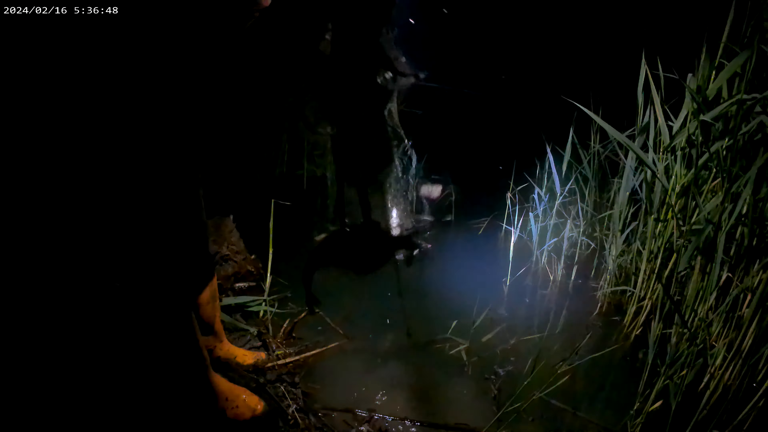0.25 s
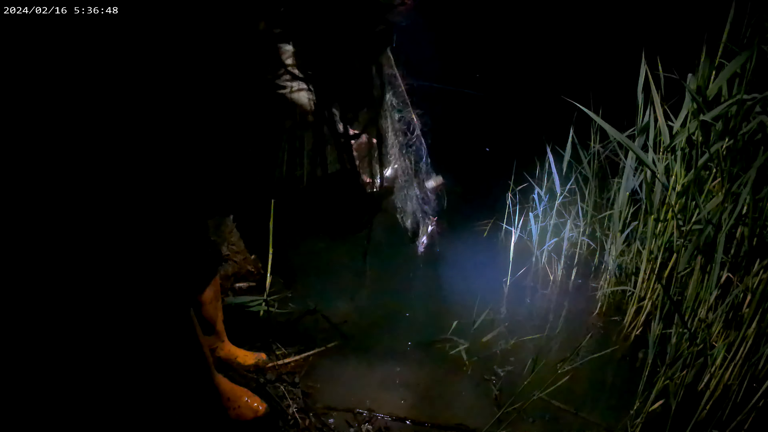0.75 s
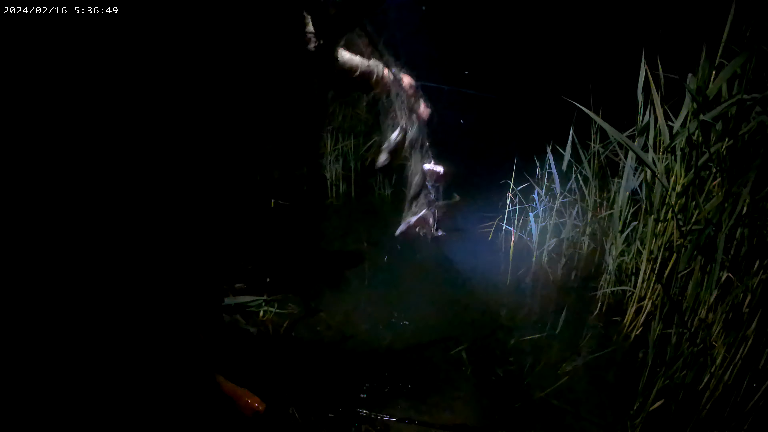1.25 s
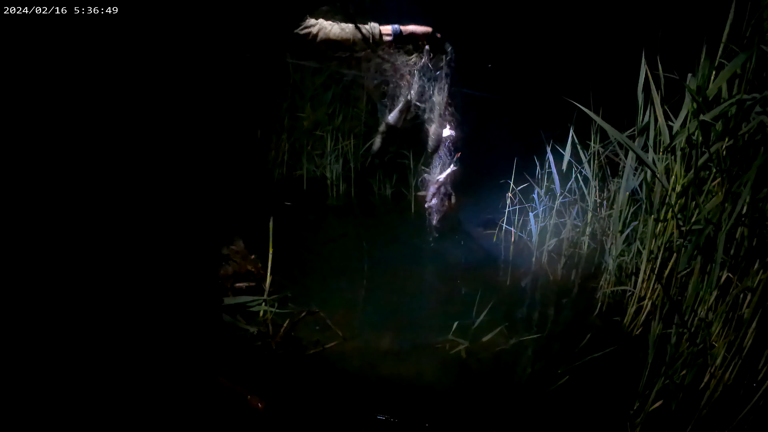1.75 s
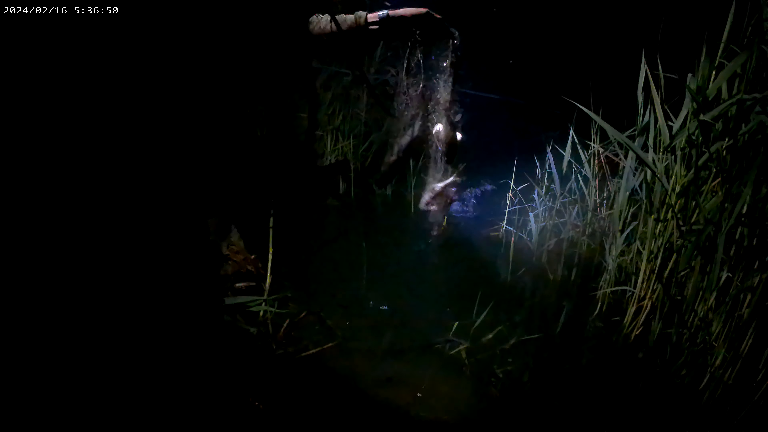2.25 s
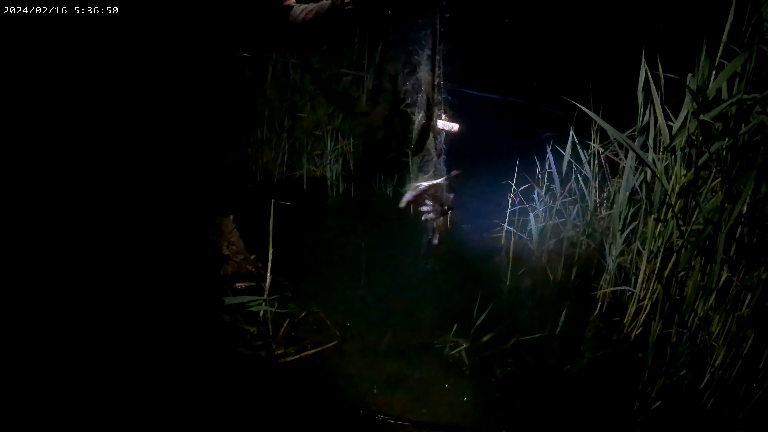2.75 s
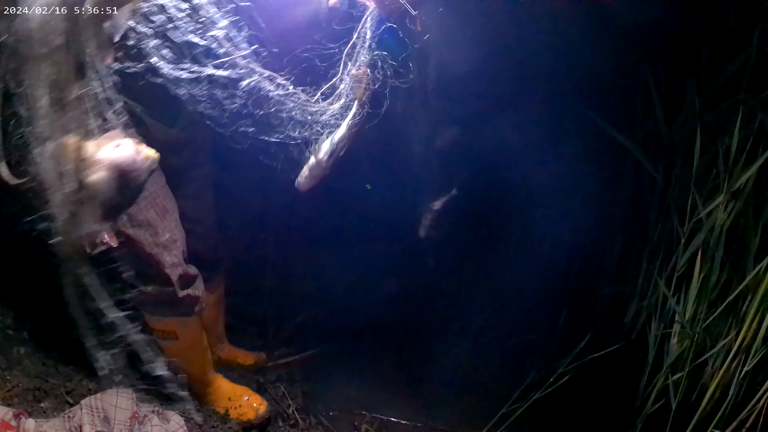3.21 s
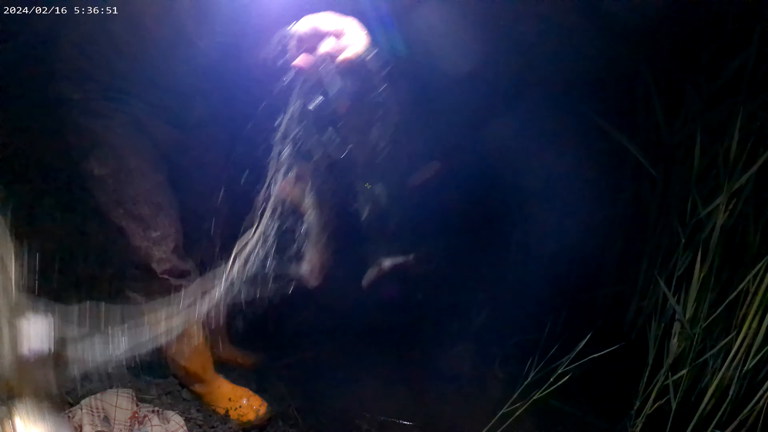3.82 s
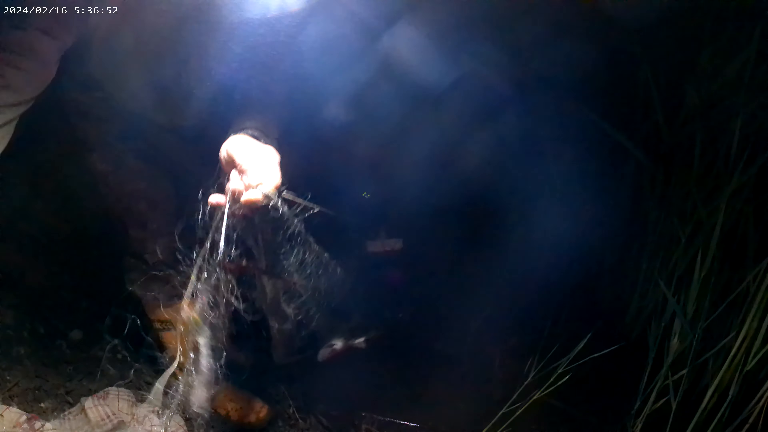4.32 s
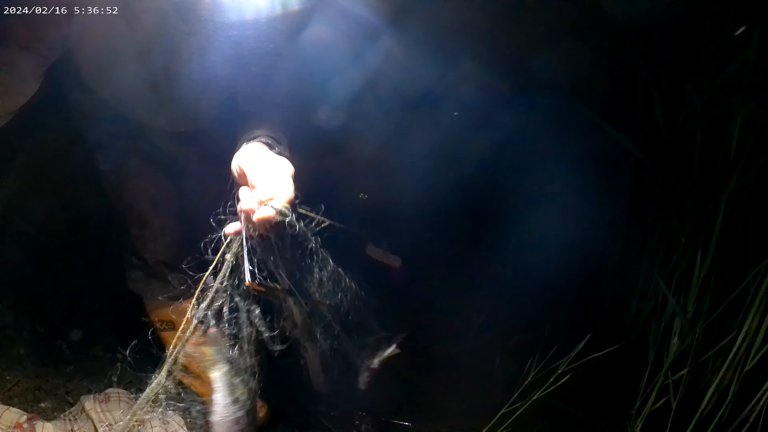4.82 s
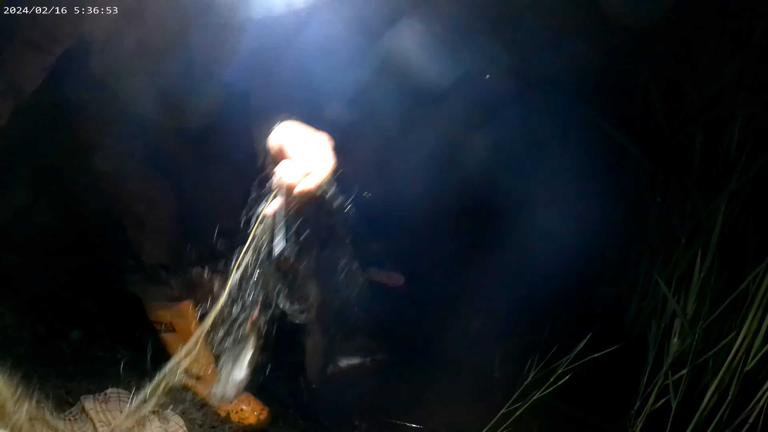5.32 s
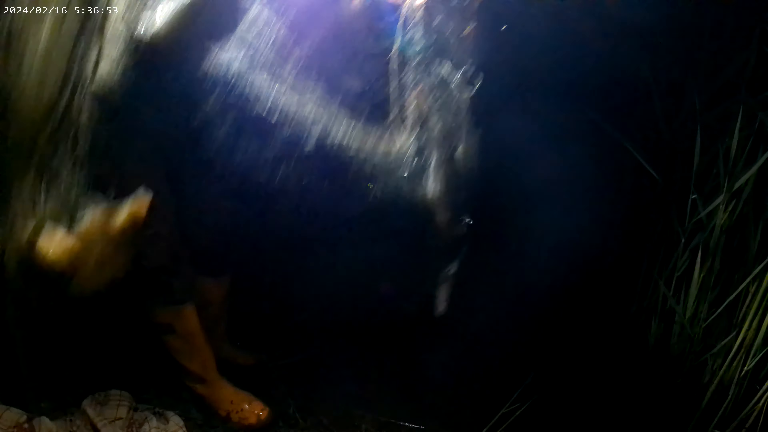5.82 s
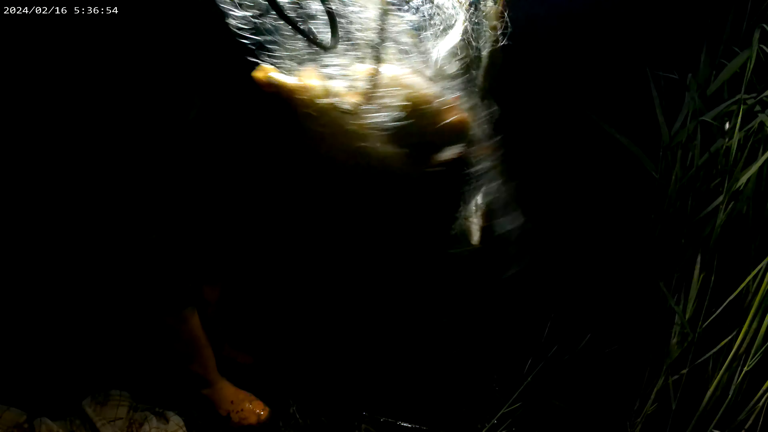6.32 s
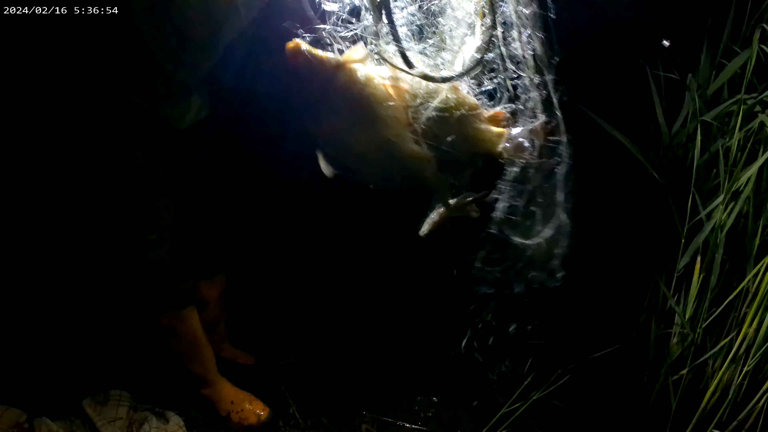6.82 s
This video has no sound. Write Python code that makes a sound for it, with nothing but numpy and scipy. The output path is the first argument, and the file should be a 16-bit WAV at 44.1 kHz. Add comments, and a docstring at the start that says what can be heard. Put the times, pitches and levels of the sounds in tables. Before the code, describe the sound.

A wet fishing net is lifted by hand from still water, close to a body-worn microphone. After one sharp click, water falls in a small splash and single plops, then in a longer gurgling trickle. The mesh then knocks and rubs against the microphone's case, squelching and crackling. Strands tick, one snaps free, and a last drop falls. A quiet rumble, hiss, soft regular thump and faint high whine continue throughout.

```python
"""Night, still water: a wet gill net is lifted and gathered by hand, close to a small body-worn camera.
The camera gives one sharp click, then water falls off the mesh in a short splash and single plops, with
a longer run-off around two seconds. From about four seconds handling knocks and rubs the camera's case
while the strands tick and squelch. A taut strand snaps free near six seconds, and a last drop falls.
Under it all lie a low rumble, hiss, and the camera's own soft regular thump and thin whine."""
import sys
import numpy as np
from scipy import signal
from scipy.fft import rfft, irfft, next_fast_len
from scipy.io import wavfile
from scipy.ndimage import uniform_filter1d

SR = 44100
rng = np.random.default_rng(int(sys.argv[2]) if len(sys.argv) > 2 else 0)


def to_wav(s):
    """Save 16-bit WAV."""
    ch = np.atleast_2d(s).T  # columns
    pcm = np.round(np.clip(ch, -1, 1) * 32767)  # PCM
    wavfile.write(sys.argv[1], SR, pcm.astype(np.int16))


N = 311234
T = np.arange(N) / SR

# Air bubbles pulled under by the larger drops.
# Each row: start in seconds, pitch in Hz, peak in dB, length in seconds, glide in octaves.
DROP_BUBBLES = [(.509, 954, -38, 0.0089, -0.11), (.511, 1140, -53, 0.014, -0.15),
                (0.513, 1920, -61, .007, 0), (0.509, 736, -53, 0.034, -0.064),
                (.516, 910, -58, 0.034, -0.27), (0.583, 1340, -60, 0.02, -0.16),
                (0.604, 608, -51, 0.032, 0.17), (.628, 796, -59, 0.033, 0.82), (0.666, 1250, -65, .013, .1),
                (0.684, 547, -54, 0.04, 0.36), (0.725, 825, -64, .014, .15),
                (1.608, 1120, -58, .012, -0.088), (1.661, 1290, -55, 0.006, 0.11),
                (1.758, 544, -55.5, 0.018, 0.2), (1.882, 1640, -50, 0.0097, -0.03),
                (1.978, 1130, -49, 0.0036, 0.056), (1.99, 1120, -48, 0.0054, -0.057),
                (2.012, 874, -51.5, 0.035, 0.065), (2.015, 1300, -56, .008, -0.021),
                (2.023, 1030, -51, .014, 0.039), (2.034, 550, -51.5, 0.011, 0.05),
                (2.058, 3700, -46.5, 0.0056, 0.37), (2.062, 1180, -52, 0.011, .1),
                (2.068, 3700, -54, 0.005, -0.4), (2.069, 1700, -53.5, 0.011, 0.7),
                (2.079, 690, -53, 0.018, -0.4), (2.083, 1080, -51, .016, -0.18),
                (2.099, 1800, -49, 0.0075, 0), (2.104, 850, -51, 0.014, 0.19),
                (2.1062, 1570, -35.5, 0.0042, -0.63), (2.175, 1050, -35, 0.012, -0.15),
                (2.186, 2950, -53, .0055, 0), (2.204, 870, -34.5, 0.0072, -0.074),
                (2.2205, 919, -32, 0.023, -.05), (2.229, 477, -55, 0.026, -0.31),
                (2.266, 764, -50, 0.0068, 0.05), (2.277, 1370, -52, 0.02, -0.21),
                (2.286, 700, -50, 0.018, .12), (2.296, 2170, -60, .012, .05),
                (2.302, 906, -49.5, 0.024, .1), (2.326, 1350, -57, 0.014, -0.02),
                (2.356, 1090, -47.5, 0.019, 0.24), (2.362, 853, -45, 0.031, 0.063),
                (2.369, 1560, -56, .011, 0.2), (2.391, 373, -51, 0.061, 0.75), (2.458, 1365, -59, .015, 0),
                (2.896, 1120, -50, 0.0086, 0.19), (2.928, 1320, -60, .012, .1),
                (6.687, 1570, -50.5, 0.014, -0.28), (6.698, 1500, -61, .012, 0)]
# Air pockets in the squeezed mesh. Each row reads as for the drop bubbles.
AIR_POCKETS = [(3.9117, 1410, -43.5, .006, 0.036), (3.912, 2100, -50, .005, 0),
               (3.922, 1220, -51, 0.0088, 0), (4.01, 1280, -55, .012, .05), (4.054, 1150, -51, .02, .11),
               (4.106, 1090, -53, 0.0063, 0), (4.192, 1055, -48, .012, -0.14),
               (4.295, 1150, -46, 0.0054, 0), (4.315, 980, -51, .009, 0.14), (4.373, 2200, -55, .005, -.1),
               (4.447, 1490, -52, 0.0059, 0.02)]
# Fine droplets striking the surface alone. Each row: start in seconds, peak in dB, pitch in Hz.
DROPLET_PINGS = [(1.938, -46.5, 5570), (2.01, -55, 5590), (2.105, -46, 5450), (2.108, -51, 4160),
                 (2.160, -55, 4200), (2.271, -55, 3770), (2.298, -48, 5740), (2.307, -48, 3960),
                 (2.369, -52, 5030)]
# Wet strands snapping past each other. Each row: start in seconds, peak in dB, centre in Hz.
STRAND_TICKS = [(0.32, -52, 5700), (0.412, -57, 5960), (0.756, -52.5, 4150), (.772, -56.5, 5500),
                (0.938, -57.5, 5000), (1.039, -56, 6000), (1.335, -56.5, 3330), (3.508, -55.5, 4770),
                (3.673, -52.5, 7850), (5.455, -55, 4300), (5.608, -59, 4440), (6.254, -54.5, 4900),
                (6.72, -60, 5480)]
# Strands catching on the case and flicking free. Each row: start in seconds, peak in dB.
STRAND_FLICKS = [(3.918, -49), (4.008, -40.5), (4.134, -50), (4.323, -53), (4.539, -55), (4.677, -43.5),
                 (4.982, -48), (5.0746, -52), (5.135, -55), (5.17, -58), (5.3425, -55), (5.5176, -56)]
# Blows on the case, right at the microphone. Each row: start in seconds, peak in dB, scrape tilt in dB
# per octave, pitch in Hz, ring and slide times in seconds, scrape against ring in dB.
CASE_BLOWS = [(3.9103, -35.5, -0.5, 970, 0.0026, 0.0022, -5),
              (3.9909, -24.5, -1.5, 1144, 0.0025, 0.003, 10), (4.0838, -38, -5, 620, 0.0014, 0.0014, 4),
              (4.0885, -27, -2, 590, 0.0031, 0.0022, -3.5), (4.143, -42, -2, 1000, 0.0018, .0015, 4),
              (4.1812, -22.5, -2.5, 374, 0.003, 0.0012, 2.5),
              (4.1861, -23.5, -2.5, 604, 0.00093, 0.00047, 0.5),
              (4.2572, -36.5, -2.5, 640, 0.00089, 0.00096, 3), (4.31, -38, -2.5, 1046, .004, 0.00043, 5),
              (4.369, -39.5, -5, 474, 0.0016, 0.0009, -2), (4.4413, -28, 0, 514, 0.0047, 0.0029, -1),
              (5.438, -46, -1, 416, .004, .002, -3), (5.5182, -37.5, -1.5, 670, 0.00088, 0.0013, -2)]
# Folds of wet mesh hitting the case.
# Each row: start in seconds, peak in dB, tilt in dB per octave, slide time in seconds.
MESH_FLAPS = [(3.872, -39.5, -2.5, 0.0038), (3.936, -48, -1, .003), (4.017, -45, 4, 0.0042),
              (4.077, -40, 1.5, 0.0022), (4.091, -38, -1.5, 0.0017), (4.102, -49, -1, 0.0035),
              (4.129, -41.5, 0, 0.0082), (4.224, -43, 1.5, 0.0073), (4.284, -40.5, -3.5, 0.0036),
              (4.295, -36, -1, 0.0025), (4.305, -51, -3, 0.0056), (4.372, -49.5, 8, 0.0036),
              (4.455, -40.5, -0.5, 0.0078), (4.523, -49, 0.5, 0.012), (4.636, -50.5, 0, 0.0062)]
# Resonances of the case around the microphone. Each row: centre in Hz, width in Hz, gain in dB.
CASE_MODES = [(129, 170, 3), (347, 190, 2.5), (580, 450, 1.5), (950, 380, 1), (1170, 340, -3.5),
              (2520, 690, -8), (5180, 1900, -15), (8800, 1400, -20), (9970, 1100, -17),
              (15100, 2200, -20.5)]
# The camera jolting with the body. Each row: crest in seconds, frequency in Hz, peak in dB.
BODY_JOLTS = [(0.318, 10.3, -39.5), (3.189, 65, -38.5), (3.993, 166, -37), (4.469, 100, -44),
              (4.938, 59, -39)]
# Drifting pace of the camera's thump. Each row: time in seconds, thumps per second.
THUMP_PACE = [(0, 5.455), (1.4, 5.457), (3.7, 5.43), (6.2, 5.482), (7.06, 5.485)]
# Whine of the camera's power supply.
# Each row: time in seconds, pitch in Hz, sweep per picture frame in Hz, level in dB.
WHINE_TRACK = [(0, 14400, 400, -73), (2.9, 14400, 280, -75), (3.08, 14080, 200, -74.5),
               (3.35, 14270, 100, -79), (5.1, 14380, 80, -77), (6.05, 14100, 200, -81),
               (6.25, 14400, 650, -72.5), (7.06, 14420, 400, -73)]

# Movements that swell and ebb. Each row: crest in seconds, level in dB, swell and ebb times in seconds.
RUNOFF_SWELLS = [(.515, -67, 0.0056, 0.023), (.62, -70.5, .05, 0.13), (1.65, -68, 0.032, 0.027),
                 (1.85, -69.5, 0.17, .7), (2.018, -58.5, 0.015, 0.042), (2.094, -51.5, 0.023, 0.029),
                 (2.31, -56.5, 0.14, 0.06), (2.43, -62.5, .015, 0.043), (2.91, -76, .015, 0.027)]  # trickles and gushes leaving the net
CRACKLE_SWELLS = [(4.14, -74, 0.14, 0.17), (4.55, -71, .2, .2), (4.705, -63, 0.018, .035),
                  (5.15, -68, 0.032, 0.032), (5.47, -71, .1, .06), (5.71, -72.5, .06, 0.09)]  # mesh drawn through the hand
RUB_SWELLS = [(3.925, -56.5, 0.047, 0.03), (4.012, -52, 0.025, 0.029), (4.088, -49.5, 0.021, 0.031),
              (4.19, -50.5, 0.021, 0.018), (4.3, -59, .03, 0.019), (4.47, -59.5, .012, .05),
              (4.27, -59, 0.2, 0.46), (5.47, -63.5, 0.15, 0.099)]  # cloth and mesh stroking the case

# Tone of each source at the microphone. Each row: frequency in Hz, relative level in dB.
GURGLE_SPECTRUM = [(300, 3.5), (550, -3.5), (950, 6.5), (1350, 9.5), (1800, 2), (2600, -3), (4000, -29)]  # bubbles under the run-off
SPRAY_SPECTRUM = [(1500, -16), (2500, -3.5), (4000, -6), (5700, 6), (7500, -7), (10000, 5), (12000, -6),
                  (16000, -4)]  # tiny droplets
WASH_SPECTRUM = [(1500, 0.5), (2400, -8), (3300, -1.5), (4500, -1.5), (5600, 1.5), (6600, -5.5),
                 (8000, -8.5), (10000, -7.5), (12000, -15), (16000, -28)]  # dense patter on the surface
FLICK_SPECTRUM = [(1500, -18), (2500, -7), (3400, -9), (4700, -8), (5700, -1.5), (7300, -11), (8800, -2),
                  (10100, 4), (11500, -12), (13000, -15), (15000, -2), (16000, -16)]  # flicking, crackling strands
SNAP_SPECTRUM = [(300, -10), (750, 3), (1500, 4), (2200, -8), (3200, -10), (6000, -20), (16000, -38)]  # a taut strand snapping free
CLICK_SPECTRUM = [(300, 1.5), (2000, 2), (6000, 4), (11000, 3.5), (14000, -5), (16000, 5)]  # the electrical click
BACKGROUND_SPECTRUM = [(15, 1), (25, -5.5), (43, -2.5), (63, 1.5), (134, -9), (250, -14), (400, -17.5),
                       (600, -21.5), (1030, -24.5), (1350, -27), (1900, -30), (3400, -34), (11000, -39),
                       (13000, -37), (16000, -42)]  # rumble and hiss


def plops(waver_db=1, droplet_cycles=7.5):
    """Close drops each trap a bubble that wavers in the stirred water; single droplets ping."""
    out = np.zeros(N)
    for start, hz, db, length, glide in DROP_BUBBLES:
        ring = bubble(hz, length, glide)
        waver = wander(SR, size=200)[:len(ring)]
        add(out, start, ring * undb(db + waver_db * waver))
    for start, db, hz in DROPLET_PINGS:
        add(out, start, undb(db) * bubble(hz, droplet_cycles / hz, glide=0))
    return out


def runoff():
    """Water off the net patters on the surface: bubbles gurgle, and spray and wash land just after."""
    chirps = swarm(count=9000, low_hz=400, high_hz=2400, cycles=6, spread_db=9, glide=.25)
    gliders = swarm(count=900, low_hz=450, high_hz=1900, cycles=20, spread_db=7, glide=.35)
    droplets = swarm(count=7000, low_hz=2000, high_hz=11000, cycles=7, spread_db=14, glide=.2)
    gurgle = level(colour(chirps, GURGLE_SPECTRUM), 0) + level(colour(gliders, GURGLE_SPECTRUM), -3.5)
    spray = level(colour(droplets, SPRAY_SPECTRUM), -9)
    wash = level(colour(grains(rate=8300, spread_db=1.6), WASH_SPECTRUM), -4)
    return (gurgle * swells(RUNOFF_SWELLS)
            + spray * swells(RUNOFF_SWELLS, delay_s=.0049)
            + wash * swells(RUNOFF_SWELLS, delay_s=.0077))


def strands(tick_cycles=22):
    """The mesh crackles as the hand draws it in; strands slip free in bright ticks and flicks."""
    crackle = colour(grains(rate=700, spread_db=1.5), FLICK_SPECTRUM)
    out = level(crackle, 0) * swells(CRACKLE_SWELLS)
    for start, db, hz in STRAND_TICKS:
        friction = slip(tick_cycles / hz)  # high ticks die soonest
        width = .72 * hz
        tick = resonate(resonate(friction, hz, width), hz, width)
        add(out, start, peak(tick, db))
    for start, db in STRAND_FLICKS:
        flick = colour(slip(length_s=.002), FLICK_SPECTRUM)
        add(out, start, peak(flick, db))
    return out


def knocks(rise_s=.001):
    """A soft blow rings briefly at a pitch set by what hits the case, and scrapes across it."""
    out = np.zeros(N)
    t = np.arange(SR // 12) / SR
    for start, db, tilt_db, hz, ring_s, slide_s, scrape_db in CASE_BLOWS:
        ring = np.sin(2 * np.pi * hz * t) * (1 - np.exp(-t / rise_s)) * np.exp(-t / ring_s)
        scrape = through_case(slip(slide_s), tilt_db)
        blow = peak(ring, 0) + peak(scrape, scrape_db)
        add(out, start, peak(blow, db))
    return out


def flaps(grip_spread=.06, catch_db=.5):
    """Wet folds slap and slide unevenly on the case, each under a slightly different grip."""
    out = np.zeros(N)
    for start, db, tilt_db, slide_s in MESH_FLAPS:
        slide = slip(slide_s)
        grip = 1 + grip_spread * rng.uniform(-1, 1)
        catching = undb(catch_db * wander(len(slide), size=50))
        add(out, start, peak(through_case(slide * catching, tilt_db, grip), db))
    return out


def squelches():
    """Air pockets pop and squeak in the squeezed wet mesh, the tiny ones along with the rubbing."""
    pops = swarm(count=1100, low_hz=567, high_hz=1614, cycles=16, spread_db=6, glide=.19)
    out = level(colour(pops, GURGLE_SPECTRUM), -7) * swells(RUB_SWELLS)
    for start, hz, db, length, glide in AIR_POCKETS:
        add(out, start, undb(db) * bubble(hz, length, glide))
    return out


def strand_snap(start_s=5.957, db=-44):
    """One taut strand snaps free in a short burst of friction."""
    out = np.zeros(N)
    snap = colour(slip(length_s=.0015), SNAP_SPECTRUM)
    add(out, start_s, peak(snap, db))
    return out


def rubbing(soft_patchy_db=2.5, hard_patchy_db=3.5):
    """Cloth and mesh rustle through the case in clumps of soft catches and harder, brighter patches."""
    soft = level(through_case(grains(rate=2500, spread_db=.21), tilt_db=-1), 0)
    soft *= undb(soft_patchy_db * wander(N, size=400))
    hard = through_case(grains(rate=2500, spread_db=1), tilt_db=6)
    hard *= undb(hard_patchy_db * np.clip(wander(N, size=700), -2, 1.2))
    return (soft + level(hard, -11)) * swells(RUB_SWELLS)


def through_case(push, tilt_db, grip=1):
    """The plastic case rings in damped bands; hard contact favours the upper ones, grip shifts them."""
    f = np.geomspace(20, SR / 2, 400)
    bands = (undb(db) / (1 + (2 * (f - hz * grip) / width) ** 2) for hz, width, db in CASE_MODES)
    power = sum(band ** 2 for band in bands) + undb(-62) ** 2
    power = power * f ** 2 / (f ** 2 + 60 ** 2)  # bass falls away below 60 Hz
    octaves = np.log2(np.clip(f, 200, 4000) / 1000)
    response_db = 10 * np.log10(power) + tilt_db * octaves
    return colour(push, np.column_stack([f, response_db]))


def jolts():
    """Each jolt of the body is one slow swing of pressure at the microphone."""
    out = np.zeros(N)
    for crest, hz, db in BODY_JOLTS:
        cycles = (T - crest) * hz
        out += undb(db) * np.exp(-(2 * cycles) ** 2) * np.cos(2 * np.pi * cycles)
    return out


def click(start_s=.1512):
    """One dry electrical click: a single spike with no ring."""
    out = np.zeros(N)
    add(out, start_s, colour(signal.unit_impulse(SR // 50), CLICK_SPECTRUM))
    return out


def thumps(first_s=.1739, hz=95, rise_hz_per_s=7300, width_s=.0073, db=-41.5):
    """The camera's electronics thump evenly; each soft pulse sweeps upward through the bass."""
    rate = np.interp(T, *np.transpose(THUMP_PACE))
    turns = np.cumsum(rate) / SR - first_s * rate[0]
    t = (turns - np.round(turns)) / rate  # seconds from the nearest thump
    envelope = np.exp(1 - np.hypot(1, t / width_s * 1.82))
    return undb(db) * envelope * np.cos(2 * np.pi * (hz * t + rise_hz_per_s * t ** 2 / 2))


def whine(frames_per_s=30, lower_db=-13):
    """The power supply's thin tone ramps and swells with each frame's load, over a fainter, lower one."""
    times, *columns = np.transpose(WHINE_TRACK)
    hz, sweep_hz, db = (np.interp(T, times, column) for column in columns)
    ramp = (T * frames_per_s - .1) % 1 - .5
    jitter_hz = 200 * level(wander(N, size=40), 0)
    phase = 2 * np.pi * np.cumsum(hz + sweep_hz * ramp + jitter_hz) / SR
    tone = np.sin(phase) + undb(lower_db) * np.sin(phase * 2 / 3)
    load = 1 + sweep_hz / 1000 * np.cos(2 * np.pi * ramp)
    return level(tone * load, 0) * undb(db)


def background(db=-53, uneven_db=1, rumble_hz=130):
    """Low, unevenly swelling rumble falling away into an even hiss."""
    noise = colour(rng.standard_normal(N), BACKGROUND_SPECTRUM)
    rumble = signal.sosfilt(signal.butter(2, rumble_hz, fs=SR, output="sos"), noise)
    hiss = noise - rumble
    return level(hiss + rumble * undb(uneven_db * wander(N, size=3000)), db)


def bubble(hz, length, glide):
    """Trapped air rings as a damped tone, gliding ever faster: glide octaves in length seconds."""
    t = np.arange(int(2 * length * SR)) / SR
    age = t / length
    pitch = hz * 2 ** (glide * np.minimum(age, 1.2) ** 1.28)
    attack = 1 - np.exp(-t / .0004)
    envelope = attack * np.exp(-.5 * age - .96 * age ** 4)
    return envelope / envelope.max() * np.sin(2 * np.pi * np.cumsum(pitch) / SR)


def swarm(count, low_hz, high_hz, cycles, spread_db, glide):
    """Many small bubbles of random time, pitch, strength and glide."""
    out = np.zeros(N)
    for when, height, strength, turn in rng.random((count, 4)):
        hz = low_hz * (high_hz / low_hz) ** height
        ring = bubble(hz, cycles / hz, glide * (2 * turn - 1))
        add(out, when * T[-1], undb(spread_db * strength ** 2) * ring)
    return out


def slip(length_s):
    """A short slide: friction noise that swells and dies on this time scale."""
    t = np.arange(SR // 12) / SR
    return rng.standard_normal(len(t)) * np.sqrt(t) * np.exp(-t / length_s)


def grains(rate, spread_db):
    """Tiny impacts of random time and size, rate a second."""
    impacts = (rng.random(N) < rate / SR) * rng.standard_normal(N)
    return impacts * undb(spread_db * np.clip(rng.standard_normal(N), -2, 2))


def swells(rows, delay_s=0):
    """Gain of overlapping movements, each growing to its crest and dying away exponentially."""
    t = T - delay_s
    power = np.zeros(N)
    for crest, db, swell, ebb in rows:
        decay = np.maximum((crest - t) / swell, (t - crest) / ebb)
        power += (undb(db) * np.exp(-decay)) ** 2
    return np.sqrt(power)


def wander(count, size):
    """Smooth chance that changes over size samples; spread 1."""
    return uniform_filter1d(rng.standard_normal(count), size=size, mode="wrap") * np.sqrt(size)


def colour(x, points):
    """Shape a sound with a (Hz, dB) spectrum; causal, so that attacks stay sharp."""
    hz, db = np.transpose(points)
    size = 2 * next_fast_len(len(x) // 2 + 1)
    f = np.maximum(np.fft.rfftfreq(size, 1 / SR), 1)
    gain = undb(np.interp(np.log(f), np.log(hz), db))
    cepstrum = irfft(np.log(gain))
    cepstrum[1:size // 2] *= 2  # fold onto positive time for minimum phase
    cepstrum[size // 2 + 1:] = 0
    return irfft(rfft(x, size) * np.exp(rfft(cepstrum)), size)[:len(x)]


def resonate(x, hz, width):
    """One resonance, gain 1 at its centre."""
    return signal.lfilter(*signal.iirpeak(hz, hz / width, fs=SR), x)


def undb(db):
    """Decibels to gain."""
    return 10 ** (np.asarray(db) / 20)


def level(x, db):
    """Set the rms level."""
    return x * undb(db) / np.sqrt(np.mean(x ** 2))


def peak(x, db):
    """Set the peak level."""
    return x * undb(db) / np.abs(x).max()


def add(out, start_s, x):
    """Mix a short sound in at its start time."""
    i = int(round(start_s * SR))
    out[i:i + len(x)] += x[:N - i]


def scene():
    """Water and net at close range, handling on the case and the camera's own noises, in mono."""
    water = plops() + runoff()
    handling = strands() + knocks() + flaps() + squelches() + strand_snap() + rubbing() + jolts()
    electronics = click() + thumps() + whine()
    return (water + handling + electronics + background())[None]


def record(dry):
    """The body-worn camera cuts the top above 16 kHz."""
    return signal.sosfilt(signal.ellip(8, .2, 70, 16000, fs=SR, output="sos"), dry)


dry = scene()
out = record(dry)
to_wav(out)
```